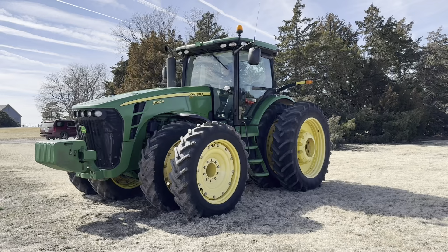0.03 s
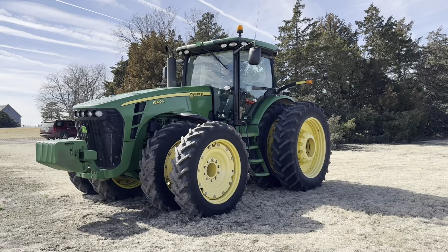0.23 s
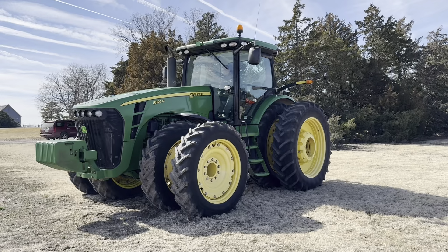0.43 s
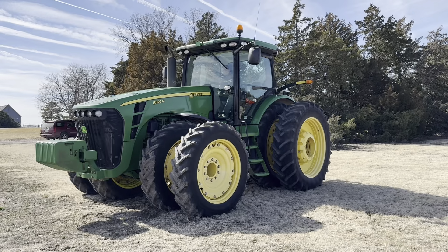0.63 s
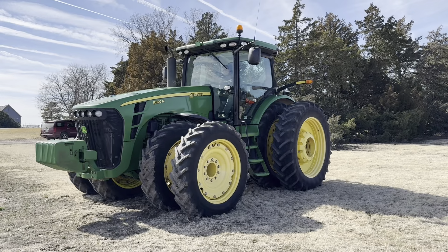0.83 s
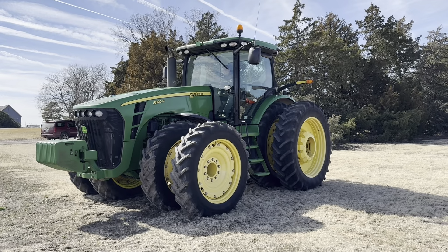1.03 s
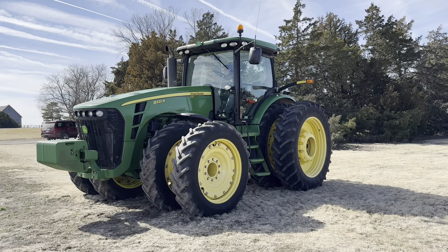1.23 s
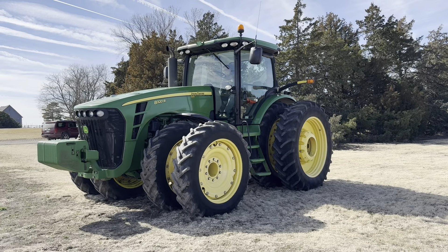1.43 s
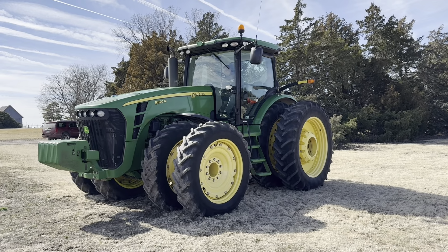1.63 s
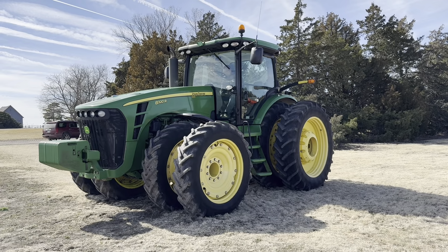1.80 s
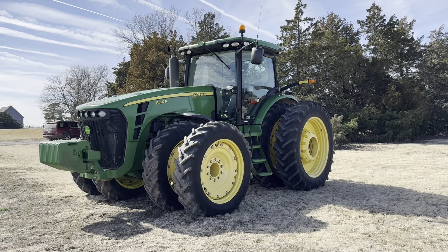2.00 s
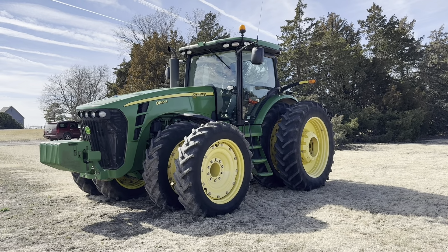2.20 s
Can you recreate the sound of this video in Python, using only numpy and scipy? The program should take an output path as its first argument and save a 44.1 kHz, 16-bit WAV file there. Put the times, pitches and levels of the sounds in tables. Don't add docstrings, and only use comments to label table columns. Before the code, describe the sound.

A large diesel tractor's starter clanks in and cranks heavily after a quiet, breezy farmyard with birds

```python
import sys
import numpy as np
from scipy import signal
from scipy.fft import rfft, irfft
from scipy.io import wavfile
from scipy.ndimage import uniform_filter1d

SR = 44100
rng = np.random.default_rng(int(sys.argv[2]) if len(sys.argv) > 2 else 0)


def transcribe(signal):
    frames = np.atleast_2d(signal).T
    limited = np.clip(frames, -1, 1)
    pcm = np.round(limited * 32767).astype(np.int16)
    wavfile.write(sys.argv[1], SR, pcm)


def volts_from_decibels(level):
    exponent = np.asarray(level, float) / 20
    return 10 ** exponent


N = 99577
T = np.arange(N) / SR
HZ = np.maximum(np.arange(N // 2 + 1) * SR / N, 1)

# (time [s], buffet level [dB], leaves level [dB], pump level [dB])
WIND = [(.05, -72.5, -14.5, -18), (.25, -67.5, -8.5, -10), (.45, -59, -13, -10), (.6, -62, -16, -1.5),
        (.85, -61.5, -17, 3.5), (1.03, -73.5, -26, -8.5), (1.14, -62.5, -9, -25), (1.22, -56, -2, 4),
        (1.35, -53.5, -0.5, 9.5), (1.45, -63.5, -3, 7), (1.6, -56, -2, 6.5), (1.75, -77, -15, 8)]
# (time [s], level [dB], decay t60 [s], bright share [0-1])
BLOWS = [
    (1.7328, -42, 0.39, 0.57),
    (1.7579, -21.5, 0.09, 1),
    (1.787, -27, 0.056, 0.84),
    (1.794, -27.5, 0.029, 0.1),
    (2.237, -37, 0.21, 0.23),
]
# (time [s], rattle level [dB], whine level [dB])
CRANK = [
    (1.79, -33.5, -58),
    (1.83, -32.5, -43),
    (1.89, -36, -39),
    (1.95, -36, -39),
    (2.0, -36.5, -38),
    (2.04, -36.5, -38),
    (2.08, -36.5, -38),
    (2.11, -35.5, -45),
    (2.17, -37, -52),
    (2.25, -36, -52),
]
# (time [s], tooth-mesh frequency [Hz])
SPEED = [(1.79, 430), (1.86, 470), (1.9, 500), (1.95, 540), (1.97, 560), (1.985, 630), (2.03, 677),
         (2.06, 645), (2.078, 620), (2.1, 545), (2.135, 490), (2.2, 430)]


def unit(x):
    return x / np.sqrt(np.mean(x ** 2))


def col(table, k):
    return np.interp(T, np.array(table)[:, 0], np.array(table)[:, k])


def over_hz(points):
    return np.interp(np.log(HZ), np.log(np.array(points)[:, 0]), np.array(points)[:, 1])


def colour(x, points):
    return unit(irfft(rfft(x) * volts_from_decibels(over_hz(points)), N))


def band(x, hz, width_hz):
    return signal.lfilter(*signal.iirpeak(hz, hz / width_hz, SR), x)


def walk(rate):
    k = int(SR / rate)
    steps = np.repeat(rng.standard_normal(N // k + 1), k)
    return 1.268 * uniform_filter1d(uniform_filter1d(steps, k), k)[:N]


def swell(start, rise, t60):
    u = np.maximum(T - start, 0)
    return np.minimum(u / rise, 1) * volts_from_decibels(-60 * np.maximum(u - rise, 0) / t60)


def diffuse_noise():
    # (frequency [Hz], left-right correlation [-1 to 1])
    likeness = [(60, 0.96), (300, 0.37), (700, 0.73), (7000, -0.2)]
    alike = np.clip(over_hz(likeness), -.95, .95)
    mid, side = rfft(rng.standard_normal((2, N)))
    common, opposed = mid * np.sqrt(1 + alike), side * np.sqrt(1 - alike)
    return irfft(np.array([common + opposed, common - opposed]), N)


def hush():
    # (frequency [Hz], spectral density [dB per Hz])
    far_spectrum = [(60, -18), (95, -2), (180, -7), (330, -10), (740, -13.5), (1500, -25.5), (3000, -31.5),
                    (6000, -54.5)]
    return colour(diffuse_noise(), far_spectrum) * volts_from_decibels(-64 + 0.094 * col(WIND, 2) + walk(6.2))


def buffet():
    centre_hz, width_hz = 58.3, 78
    rumble = band(band(diffuse_noise(), centre_hz, width_hz), centre_hz, 0.85 * width_hz)
    return unit(rumble) * volts_from_decibels(col(WIND, 1) + 1.8 * walk(16))


def leaves():
    rustle = band(band(diffuse_noise(), 6100.0, 3700.0), 3200.0, 5300.0)
    return unit(rustle) * volts_from_decibels(-77 + col(WIND, 2) + 0.74 * walk(29.8))


def pump():
    # (frequency [Hz], level [dB])
    hum = [(168, -73.5), (336, -76.5)]
    out = 0
    for k, (hz, db) in enumerate(hum):
        level = volts_from_decibels(db + k * col(WIND, 3) + 0.27 * walk(5.1))
        phase = 2 * np.pi * np.cumsum(hz * (1 + 0.00704 * walk(11.02))) / SR
        out = out + level * np.sqrt(2) * np.sin(phase)
    return out


def ticks():
    # (time [s], level [dB], centre frequency [Hz])
    taps = [
        (.2735, -69, 12000),
        (.2735, -64, 6400),
        (.0885, -72, 1500),
        (.048, -70, 1400),
        (1.545, -82, 10500),
        (1.558, -81, 10500),
        (1.575, -84, 12000),
    ]
    grit = rng.standard_normal(N)
    out = 0
    for s, db, hz in taps:
        burst = unit(band(band(grit, hz, hz / 2), hz, hz / 2))
        out = out + volts_from_decibels(db) * swell(s, .0015, .03) * burst
    return out


def note(s, length, hz_of, db, jitter):
    u = np.clip((T - s) / length, 0, 1)
    phase = 2 * np.pi * np.cumsum(hz_of(u) * jitter) / SR
    return volts_from_decibels(db) * np.sqrt(2 * np.sqrt(np.sin(np.pi * u))) * np.sin(phase)


def whistles():
    # (time [s], length [s], edge frequency [Hz], turn frequency [Hz], level [dB])
    arches = [
        (.178, .032, 3400, 5550, -75),
        (.182, .026, 3500, 4900, -82),
        (.259, .036, 3000, 4950, -75),
        (.33, .035, 3300, 4050, -82),
        (.605, .045, 3900, 2450, -78),
        (.722, .055, 3200, 2250, -81),
        (1.285, .08, 3700, 5400, -80),
        (1.41, .05, 3200, 4400, -84),
        (1.54, .032, 2900, 5500, -76),
        (1.544, .026, 2900, 4900, -78),
    ]
    # (time [s], length [s], start frequency [Hz], end frequency [Hz], level [dB])
    strokes = [(.16, .022, 3050, 3050, -82), (.192, .012, 5250, 5550, -73), (.206, .018, 4150, 4150, -71),
               (.222, .01, 4100, 3500, -72), (.238, .016, 4050, 4200, -80), (.234, .015, 3000, 3600, -77),
               (.254, .009, 4700, 5500, -77), (.258, .018, 2750, 3400, -79), (.275, .02, 3350, 3300, -78),
               (.273, .012, 4750, 4700, -72), (.293, .025, 3100, 4600, -82), (.296, .014, 4750, 4750, -79),
               (.317, .028, 2850, 3300, -75), (.358, .011, 3300, 2750, -73), (.568, .04, 3600, 4000, -84),
               (.636, .02, 3400, 3700, -79), (1.57, .022, 4060, 4060, -65), (1.598, .012, 2800, 3500, -77),
               (1.608, .014, 4900, 5400, -79), (1.621, .011, 3300, 4700, -75),
               (1.63, .024, 4700, 4650, -76), (1.612, .042, 2600, 4250, -72), (1.65, .012, 4100, 2900, -73),
               (1.66, .009, 2900, 2700, -72), (1.675, .03, 2600, 3400, -76), (1.683, .022, 3400, 3600, -78),
               (1.703, .016, 3500, 4150, -72), (1.716, .016, 3900, 2500, -72),
               (.778, .022, 3050, 3000, -82), (1.352, .025, 3900, 3700, -81)]
    bend, turn_at = 1.7, .68
    jitter = 1 + .025 * walk(250)

    def arch(u):
        return np.sin(bend * np.minimum(u / turn_at, (1 - u) / (1 - turn_at)))

    song = 0
    for s, length, edge, turn, db in arches:
        song = song + note(s, length, lambda u: edge + (turn - edge) * arch(u), db, jitter)
    for s, length, start, end, db in strokes:
        song = song + note(s, length, lambda u: start + (end - start) * u, db, np.sqrt(jitter))
    return song * volts_from_decibels(.5 + 3.5 * walk(120))


def hoarse_chips():
    # (time [s], level [dB])
    chips = [
        (.434, -71),
        (.648, -72),
        (1.252, -74),
        (.803, -80),
    ]
    centre_hz, width_hz, length_s = 2300, 600, .026
    hoarse = unit(band(band(rng.standard_normal(N), centre_hz, width_hz), centre_hz, width_hz))
    return hoarse * sum(volts_from_decibels(db) * np.sin(np.pi * np.clip((T - s) / length_s, 0, 1)) ** .5 for s, db in chips)


def birds():
    echo_s, echo_db, scatter_db, scatter_t60_s = .031, -20, -4, .22
    song = whistles() + hoarse_chips()
    tail = rng.standard_normal((2, 6000)) * volts_from_decibels(-60 * T[:6000] / scatter_t60_s)
    tail = tail / np.sqrt(np.sum(tail[0] ** 2))
    scatter = signal.fftconvolve(song[None], tail, axes=1)[:, :N]
    direct = song * volts_from_decibels(np.array([[1.], [-1.]]))
    return direct + volts_from_decibels(echo_db) * np.roll(song, int(echo_s * SR)) + volts_from_decibels(scatter_db) * scatter


def blows():
    # (frequency [Hz], spectral density [dB per Hz])
    clash = [(250, -39), (700, -2), (2000, -15.5), (4000, -3), (7000, -9), (10000, -6.5), (15500, -3.5)]
    pinion = [730, 2043, 3260, 3740, 4200, 1050]
    chatter = rng.standard_normal((2, N)) * volts_from_decibels(1.23 * walk(700))
    ring = unit(sum(band(chatter[0], 1. * hz, 150.0) for hz in pinion[:5]))
    low = unit(sum(band(chatter[0], hz, 190.0) for hz in (pinion[0], pinion[5], 560.)))
    bright = colour(chatter[1], clash) + 0.31 * ring
    out = 0
    for s, db, t60, share in BLOWS:
        mix = np.clip(share, 0, 1) * bright + np.clip(1 - share, 0, 1) * low
        out = out + volts_from_decibels(db) * swell(s, .0008, t60) * mix
    return out


def housing():
    # (time [s], frequency [Hz], level [dB], rise [s], decay t60 [s])
    rings = [(1.801, 600, -21.5, 0.0075, 0.038), (1.806, 160, -23, 0.006, 0.051),
             (1.845, 173, -21.5, 0.0086, 0.042), (1.869, 159, -27.5, 0.0086, 0.05),
             (1.925, 161.7, -31.5, 0.0062, .2), (1.955, 165, -38, 0.0054, 0.34),
             (2.055, 207.2, -33.5, 0.019, 0.36), (2.08, 203, -32, 0.0089, 0.14),
             (2.122, 165.3, -26, 0.009, 0.086), (2.19, 124.7, -28, 0.0058, 0.067),
             (1.786, 759, -29.5, 0.0035, 0.16), (1.825, 766.3, -38, 0.041, 0.33),
             (1.82, 301, -31, .015, 0.088), (1.857, 588, -36.5, 0.0046, 0.062),
             (1.885, 486.3, -32.5, 0.008, 0.14), (1.903, 639.6, -30, 0.013, 0.13),
             (1.961, 554, -30, 0.02, 0.11), (1.985, 804, -42, 0.0057, .3), (2.068, 600.7, -30, 0.013, .2),
             (2.089, 558, -29, 0.005, 0.032), (2.116, 590, -23, 0.0022, 0.039),
             (2.116, 448, -29.5, 0.0026, 0.029), (2.166, 756, -26.5, 0.0045, 0.092),
             (2.184, 707, -27.5, 0.0059, 0.12), (2.207, 763.5, -28.5, 0.0087, 0.14),
             (2.238, 2323, -41, 0.016, 0.039), (1.797, 1089, -33, 0.0052, 0.09),
             (1.955, 1171, -40.5, 0.013, 0.11), (2.1, 1159, -35.5, .006, 0.1),
             (2.121, 1169, -32.5, 0.0024, 0.1), (2.228, 1193, -38.5, 0.012, 0.28),
             (2.125, 949, -38, 0.013, 0.32), (2.061, 3132, -42, 0.015, 0.12),
             (1.815, 86.6, -38.5, .03, 0.42), (2.235, 500.5, -39, 0.018, 0.2)]
    out = 0
    for s, hz, db, rise, t60 in rings:
        out = out + volts_from_decibels(db) * swell(s, rise, t60) * np.sqrt(2) * np.sin(2 * np.pi * hz * (T - s))
    return out


def speed_gain_db():
    return 15.5 * np.log2(col(SPEED, 1) / 600)


def gear_rattle():
    # (frequency [Hz], width [Hz], level [dB])
    block_modes = [(89, 107, -3.5), (185.2, 37, 1), (583, 353, -5), (1118.6, 26, 0.5), (3125, 160, -12)]
    # (frequency [Hz], spectral density [dB per Hz])
    casing_spectrum = [(40, -32), (110, -6.5), (300, 5.5), (700, 1), (1500, -11.5), (3500, -16.5),
                       (6500, -27.5), (15000, -25.5)]
    impacts_per_s, casing_db, thud_db, split_hz = 810, 3, -4, 1800
    hit = rng.random(N) < impacts_per_s / SR
    clicks = hit * rng.standard_normal(N) + 0.21 * rng.standard_normal(N)
    block = 0
    for hz, width, db in block_modes:
        mode = band(band(clicks, hz, 1.07 * width), hz, 1.07 * width)
        block = block + volts_from_decibels(db + 2 * walk(24.8)) * mode
    casing = colour(clicks, casing_spectrum)
    dull = signal.lfilter(*signal.butter(2, split_hz, fs=SR), casing)
    sharp = signal.lfilter(*signal.butter(2, split_hz, "high", fs=SR), casing)
    shell = volts_from_decibels(thud_db) * dull - sharp * volts_from_decibels(0.63 * speed_gain_db())
    return volts_from_decibels(thud_db) * unit(block) + volts_from_decibels(casing_db + 2.1 * walk(20)) * shell


def gear_whine():
    # (multiple of mesh frequency [1], level [dB])
    partials = [(.32, -6), (1, 1), (1.24, -9), (2.5, -22), (3, -15), (4, -18), (5, -16)]
    # (frequency [Hz], width [Hz], gain [dB])
    sing = [(1600, 70, 4), (1900, 90, 2), (2750, 120, 6), (3190, 90, 6)]
    wobble, rough_db = .012, 3.
    strain_gain = 0.5
    mesh_hz = col(SPEED, 1)
    fast_db = speed_gain_db()
    strain_db = -strain_gain * uniform_filter1d(np.gradient(np.log2(mesh_hz)) * SR, size=1000)
    phase = 2 * np.pi * np.cumsum(mesh_hz * (1 + wobble * walk(60))) / SR
    out = 0
    for k, db in partials:
        level_db = db + sum(gain * np.exp(-((k * mesh_hz - f) / w) ** 2) for f, w, gain in sing)
        level_db = level_db + (k > 2) * fast_db + (k < 1) * strain_db + rough_db * walk(44.8)
        out = out + volts_from_decibels(level_db) * np.sqrt(2) * np.sin(k * phase)
    return out


def crank():
    onset = np.clip((T - CRANK[0][0] + 0.036) / 0.029, 0, 1)
    return onset * (volts_from_decibels(col(CRANK, 1)) * gear_rattle() + volts_from_decibels(col(CRANK, 2)) * gear_whine())


def ports(x):
    # (frequency [Hz], phase lead of left [rad])
    lead = [(0, 0), (860, .5), (1720, -.4), (4000, 1.7), (6200, .9), (7600, 2.6), (8200, 2.85), (9300, 2.6),
            (10500, 1.8), (16000, 1.2)]
    # (frequency [Hz], left over right [dB])
    balance = [(60, 0.), (380, 1.5), (750, 2.5), (1100, 8), (2380, 1.5), (8000, .3)]
    loose_db, loose_t60_s = -12.5, 0.12
    half = volts_from_decibels(over_hz(balance) / 2) * np.exp(.5j * np.interp(HZ, *np.array(lead).T))
    tail = rng.standard_normal((2, 2500)) * volts_from_decibels(-60 * T[:2500] / loose_t60_s)
    tail = band(tail, 2360.0, 4800.0)
    tail = tail / np.sqrt(np.sum(tail[0] ** 2))
    loose = signal.fftconvolve(x[None], tail, axes=1)[:, :N]
    direct = irfft(rfft(x) * np.array([half, 1 / half]), N)
    return direct * (T > BLOWS[0][0] - .003) + volts_from_decibels(loose_db) * loose


def scene():
    yard = hush() + buffet() + leaves() + pump() + ticks()
    return yard + birds() + ports(blows() + housing() + crank())


def roll_off(x):
    return signal.sosfilt(signal.butter(12, 17000, fs=SR, output="sos"), x)


def record(dry):
    hiss_db, open_s, rise_s, top_hz = -90.5, 0.035, 0.052, 15650
    x = dry + volts_from_decibels(hiss_db) * rng.standard_normal(dry.shape)
    x = x * np.clip((T - open_s) / rise_s, 0, 1)
    x = signal.sosfilt(signal.ellip(8, .3, 60, top_hz, fs=SR, output="sos"), x)
    return roll_off(x)


dry = scene()
out = record(dry)
transcribe(out)
```